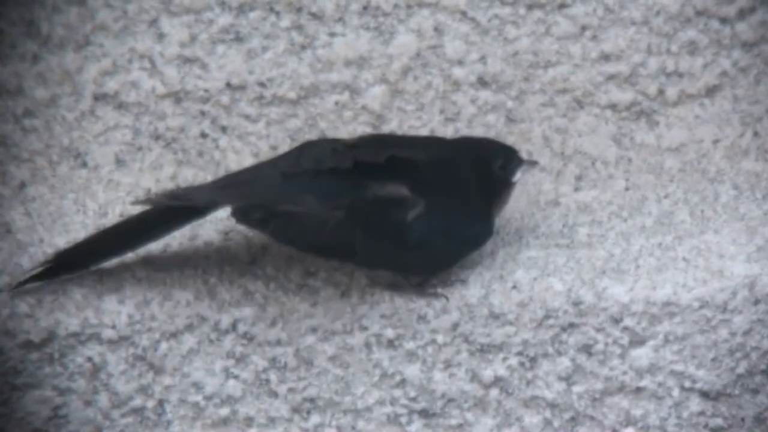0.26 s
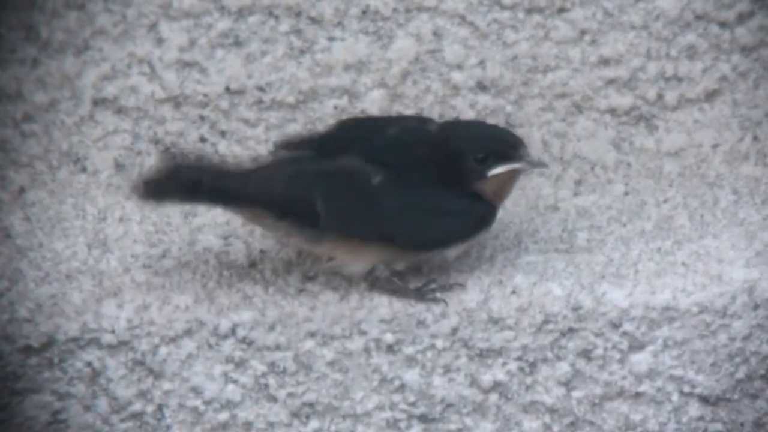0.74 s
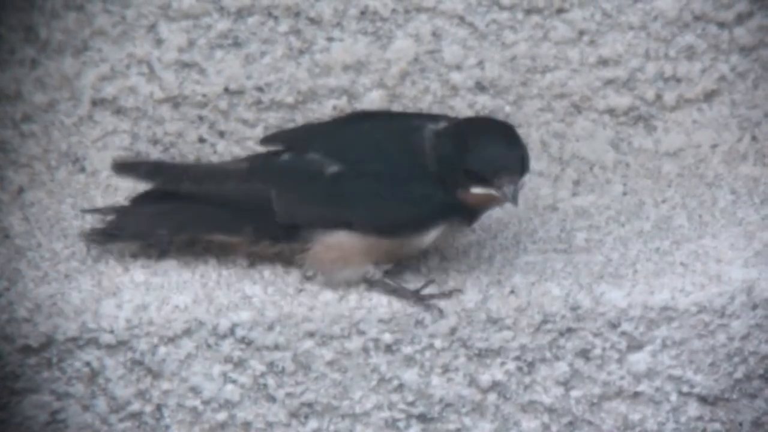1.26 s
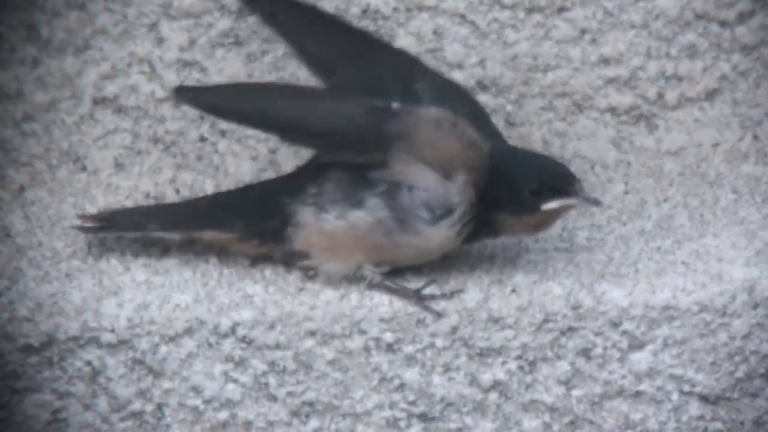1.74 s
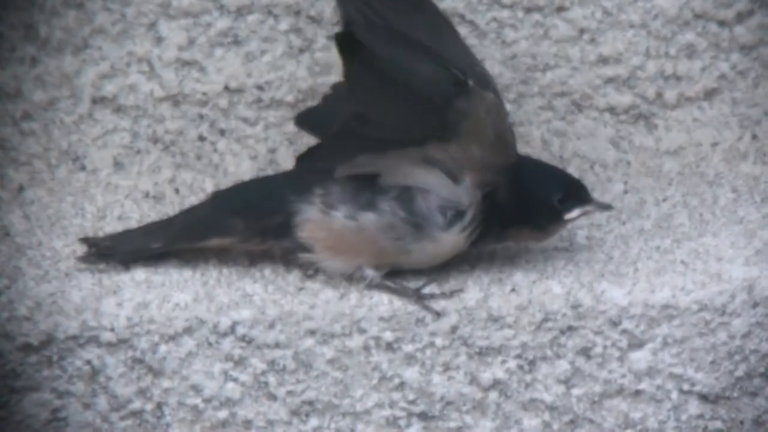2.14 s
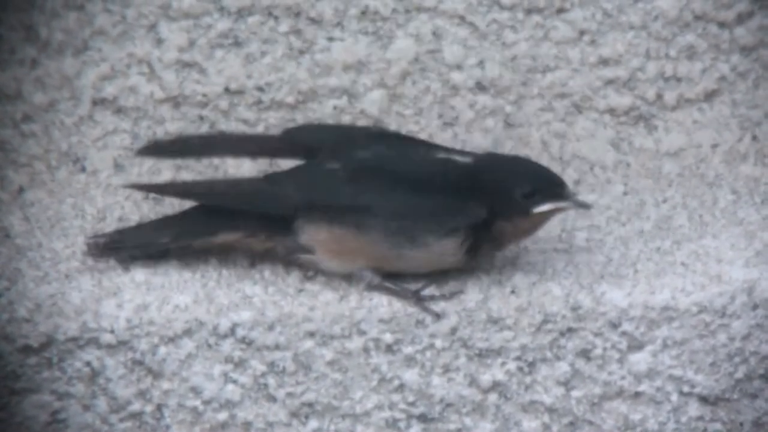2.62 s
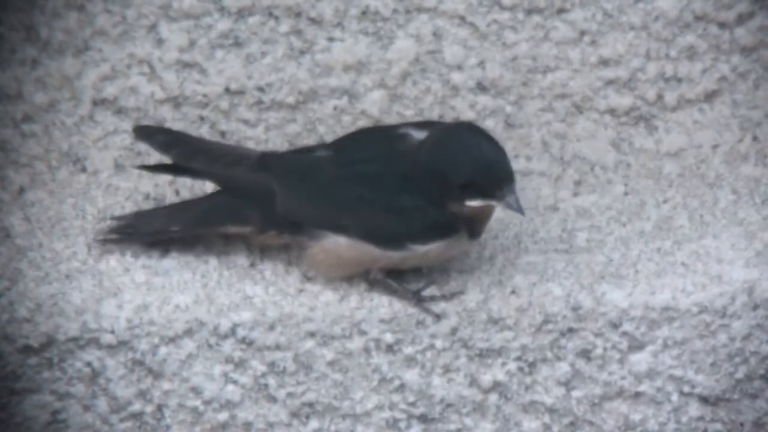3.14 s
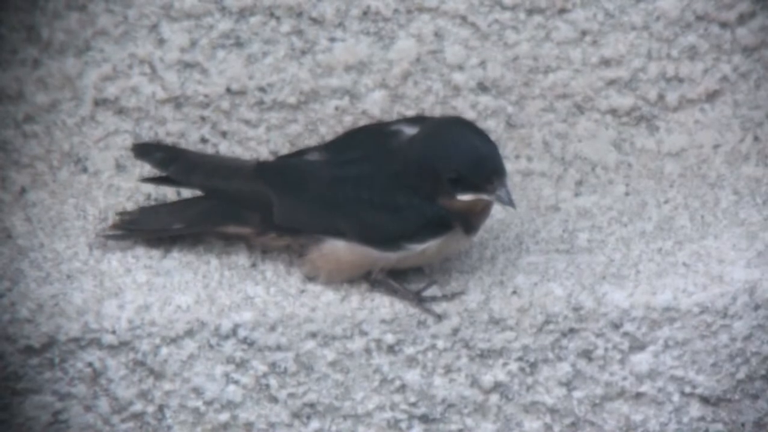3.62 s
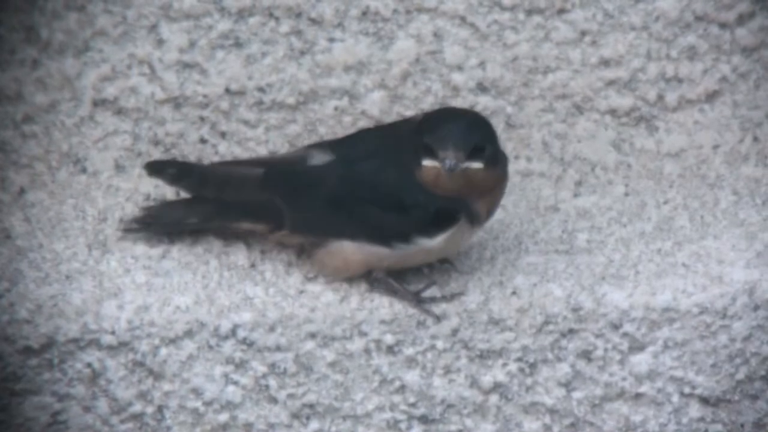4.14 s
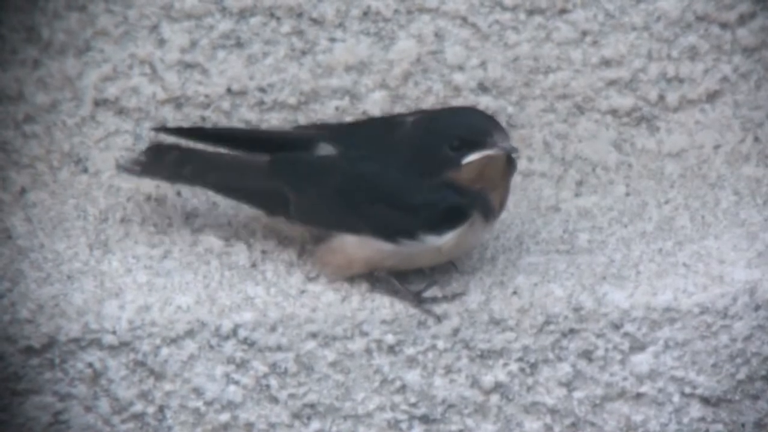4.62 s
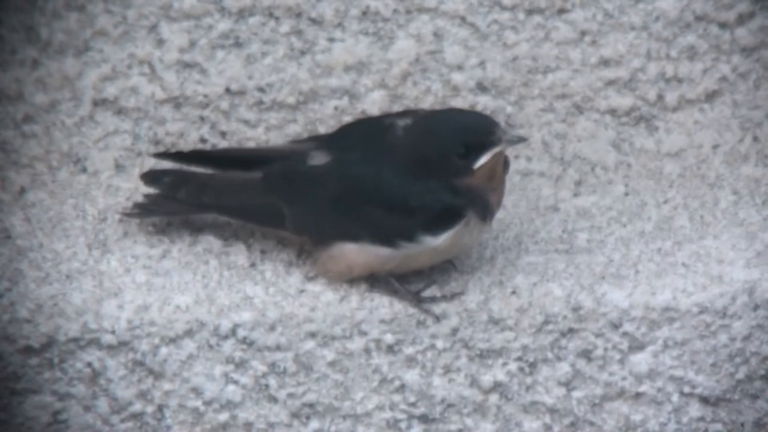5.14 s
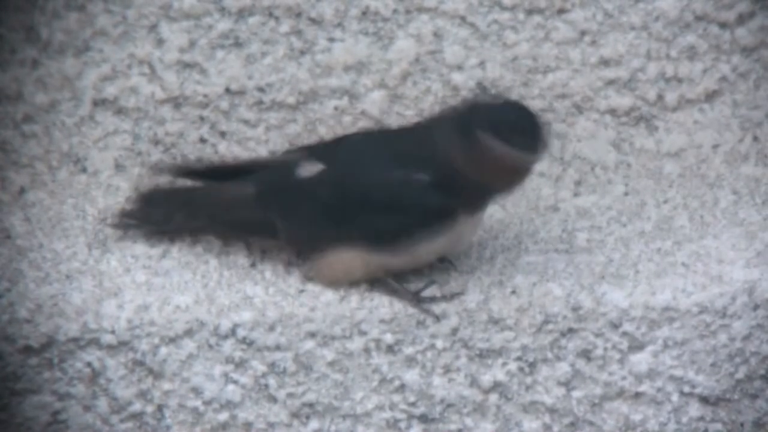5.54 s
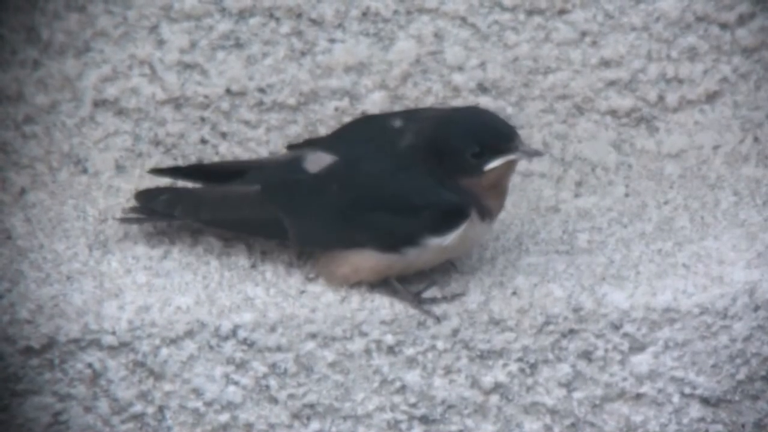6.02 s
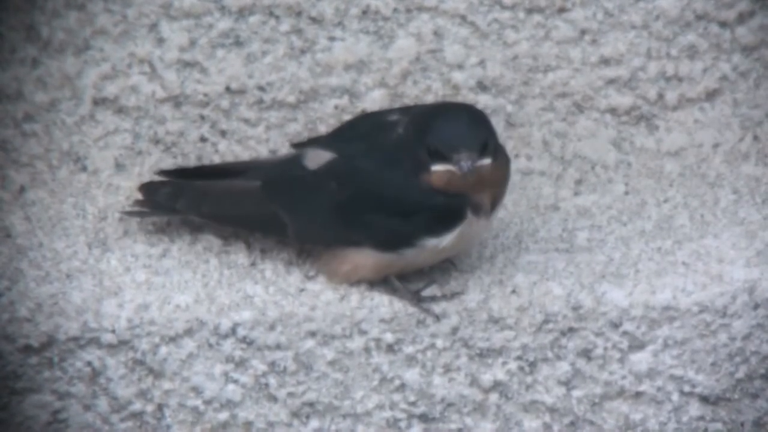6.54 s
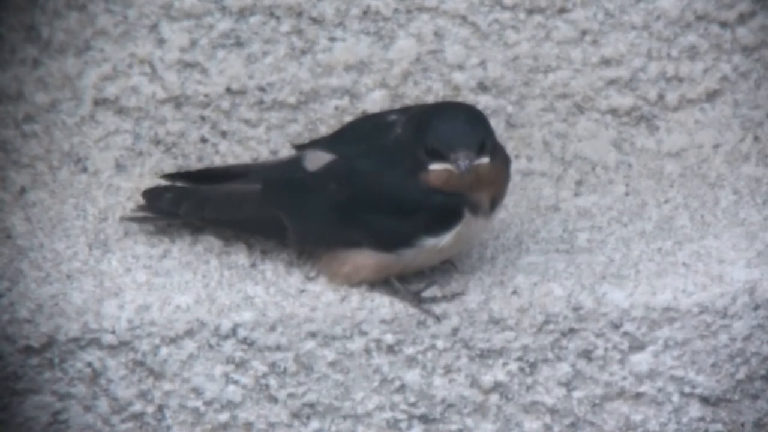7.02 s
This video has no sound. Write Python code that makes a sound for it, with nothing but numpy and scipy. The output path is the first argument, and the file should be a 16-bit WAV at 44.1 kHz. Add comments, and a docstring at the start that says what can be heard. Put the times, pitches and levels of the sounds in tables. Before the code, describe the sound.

Steady bright hiss, strongest in the upper mids, fills an outdoor spot beside stone walls. Over it a fledgling swallow repeats a hoarse, high chirp of three rapidly descending notes, six times with about a second between. Each chirp leaves a brief echoing tail. Other birds whistle softly far off, a few small dry clicks appear, and the hiss grows slightly towards the end. No wing flaps stand out.

```python
"""Young barn swallow on a stone ledge

A young barn swallow calls about once a second: three quick falling near-sine notes in raspy noise.
Nearby masonry smears each call with echoes and a noise tail; a wall further off throws it back.
Other birds, slurred sines, whistle faintly in the distance over a steady high hiss of shaped noise.
A faint hum of narrow noise bands, brief flurries of high noise, bill snaps and a few small ticks join in.
"""
import sys
import numpy as np
from scipy import signal
from scipy.fft import rfft, irfft
from scipy.io import wavfile

SR = 44100
rng = np.random.default_rng(int(sys.argv[2]) if len(sys.argv) > 2 else 0)


def store_pcm(level_fs):
    """Save levels as 16-bit WAV."""
    pcm = np.round(np.clip(level_fs, -1, 1) * 32767).astype(np.int16)
    wavfile.write(sys.argv[1], SR, np.atleast_2d(pcm).T)


N = 320607
TIME = np.arange(N) / SR
FREQS = np.arange(N // 2 + 1) * SR / N


def undb(db):
    """Decibels to gain."""
    return 10 ** (np.asarray(db) / 20)


def unit(x):
    """Scale to an rms of 1."""
    return x / np.sqrt(np.mean(x ** 2))


def add(track, s, sound):
    """Mix a sound into a track at a time in seconds."""
    i = max(int(s * SR), 0)
    track[i:i + len(sound)] += sound[:N - i]


def colour(points):
    """Gain at every frequency from (f/Hz, level/dB) points."""
    hz, db = np.transpose(points)
    return undb(np.interp(np.log(FREQS + 1), np.log(hz), db))


def bell(hz, width_hz):
    """Rounded hump over frequency, half as high half a width from its centre."""
    return .5 ** ((2 * (FREQS - hz) / width_hz) ** 2)


def noise(gain):
    """Noise of rms 1, its spectrum shaped by the given gain at every frequency."""
    return unit(irfft(rfft(rng.standard_normal(N)) * gain, N))


def gate(length_s, edge):
    """Flat envelope whose soft edges take the given share of it."""
    return signal.windows.tukey(int(length_s * SR), edge)


# spectrum of the hiss: f/Hz, relative level per Hz/dB
HISS_SPECTRUM = [(25, -58), (100, -47), (200, -40.5), (400, -30.5), (750, -21), (1400, -15), (2200, -9.5),
                 (3000, -4), (4300, -7), (6050, -15), (7500, -18), (9000, -19.5), (11000, -33),
                 (15500, -46)]
# resonances in the hiss: f/Hz, width/Hz, boost/dB
HISS_RESONANCES = [(2976, 560, 4), (6790, 430, 4.5), (8350, 690, 2.5)]
# stereo width of the hiss: f/Hz, side minus mid level/dB
HISS_WIDTH = [(30, -13), (60, -14), (125, -30), (500, -37), (700, -64), (1400, -52), (2400, -80),
              (4000, -48), (8000, -12), (12000, -4)]
HISS_DB = -30.5
SWELL_FROM_S, SWELL_DB_PER_S = 5.3, 0.97  # the hiss holds steady, then slowly grows


def outdoor_hiss(flicker_db=0.64, sizzle_db=0.35):
    """Smooth noise, strongest near 3 kHz and wide mostly in the treble; its level flickers and swells late."""
    resonance_db = sum(db * bell(hz, width) for hz, width, db in HISS_RESONANCES)
    gain = colour(HISS_SPECTRUM) * undb(resonance_db)
    treble = colour([(4000, -46), (7000, 0.5)])
    rest = np.sqrt(np.clip(1 - treble ** 2, 0, 1))

    def layer(share):
        """Noise holding its share of the whole spectrum's energy."""
        part = gain * share
        return noise(part) * np.linalg.norm(part) / np.linalg.norm(gain)

    low, high, side = layer(rest), layer(treble), layer(colour(HISS_WIDTH))
    mid = low + high * undb(sizzle_db * noise(bell(0, 60)))  # the treble flickers on its own
    swell_db = SWELL_DB_PER_S * np.maximum(TIME - SWELL_FROM_S, 0)
    level = undb(HISS_DB + swell_db + flicker_db * noise(bell(0, 30)))
    return level * (mid + np.array([side, -side]))


# noise bands of the faint hum: f/Hz, width/Hz, level/dB
HUM_BANDS = [(499.4, 9.3, -71), (653, 7.3, -73)]


def hum():
    """Noise bands so narrow that they sound almost like held tones."""
    return sum(undb(db) * noise(bell(hz, width)) for hz, width, db in HUM_BANDS)


# distant whistles: t/s, length/s, start f/Hz, end f/Hz, level/dB
DISTANT_WHISTLES = [(.313, 0.052, 2400, 2300, -36), (.368, 0.019, 4220, 4100, -32),
                    (.392, .028, 3530, 3970, -30), (1.43, .12, 4800, 4140, -37),
                    (1.689, 0.14, 3920, 3500, -33.5), (1.83, 0.064, 3950, 4820, -38),
                    (2.275, .16, 4260, 3860, -36.5), (3.23, .13, 4400, 5200, -41),
                    (4.089, .02, 3720, 3870, -28), (5.64, .027, 3590, 4010, -31),
                    (6.065, .044, 4440, 4400, -37), (6.185, .063, 3760, 3840, -34),
                    (6.69, .125, 3920, 4100, -32.5), (6.895, .13, 4190, 4070, -34.5),
                    (7.002, .059, 4050, 3420, -32)]
ARCH_HZ = 44  # every whistle bows upward in its middle


def far_birds(waver=0.0066, fade_db=2.0, wet_db=-9, t60_s=0.31):
    """Slurred sines that waver and fade on their long way, trailed by a noise reverb."""
    out, drift = np.zeros(N), noise(bell(0, 370))
    for s, length, start_hz, end_hz, db in DISTANT_WHISTLES:
        env = gate(length, edge=0.15)
        u = np.linspace(0, 1, len(env))
        hz = start_hz + (end_hz - start_hz) * u + ARCH_HZ * np.sin(np.pi * u)
        hz = hz * (1 + waver * drift[int(s * SR):][:len(env)])
        phase = 2 * np.pi * np.cumsum(hz) / SR
        add(out, s, undb(db) * env * np.sin(phase))
    out = out * undb(fade_db * noise(bell(0, 180)))
    tail = unit(rng.standard_normal(N) * undb(-60 * TIME / t60_s)) / np.sqrt(N)
    return out + undb(wet_db) * signal.fftconvolve(out, tail)[:N]


# swallow calls: t/s, length/s, top f/Hz, middle f/Hz, last f/Hz, level/dB,
# middle note accent/dB, last note accent/dB, far wall echo level/dB, bill snap level/dB
CALLS = [(0.58, 0.084, 5050, 4480, 3970, -21.5, -0.5, -1.5, -14.5, -70),
         (1.944, 0.075, 5070, 4370, 3950, -22.5, 4, .5, -14, -50),
         (2.956, .083, 5016, 4470, 3950, -26, 4.5, 2.5, -8.5, -70),
         (3.964, .089, 5020, 4450, 3940, -22.5, 2, -5, -9, -50),
         (5.162, .085, 4950, 4460, 3920, -24, 4.5, -1.5, -8.5, -35),
         (6.317, .080, 5030, 4490, 3930, -22.5, 3.5, -.5, -11, -53)]


def rasp(lead_s=0.017, trail_s=0.014, rasp_db=-30.5, squeak_db=-36, squeak_hz=5900, grain_db=2.5,
         break_share=0.58):
    """The young voice breaks up: grainy noise, with a higher squeak at the start and before the last note."""
    hoarse, squeak = np.zeros(N), np.zeros(N)
    for s, length, *_ in CALLS:
        add(hoarse, s - lead_s, gate(lead_s + length + trail_s, edge=0.51))
        add(squeak, s - lead_s, gate(0.022, edge=0.4))
        add(squeak, s + break_share * length, gate(0.018, edge=0.95))
    grain = undb(grain_db * noise(bell(0, 500)))
    body = noise(colour([(1500, -42.5), (2700, -10.5), (4300, -0.5), (6100, -9.5),
                         (7500, -20.0), (10000, -31), (15000, -48)]))
    hoarse = undb(rasp_db) * hoarse * body
    squeak = undb(squeak_db) * squeak * noise(bell(squeak_hz, 1300))
    return grain * (hoarse + squeak)


# three falling notes of a call: start t/share of call, length/share of call
CALL_RHYTHM = [(0, .32), (.335, .25), (.68, .32)]
# arched first, wavering second, scooped third note: t/share of note, f/ratio to note pitch, level/dB
NOTE_SHAPES = [
    [(0, .85, -7), (.14, .96, -3), (.28, 1, 0), (.68, .995, 0), (.85, .95, -3), (1, .84, -7)],
    [(0, .93, -7), (.18, 1.03, 1), (.45, .99, -1), (.75, .995, 0), (1, .98, -2)],
    [(0, .88, -10), (.3, .94, -6), (.52, 1.003, -1), (.82, 1, 1), (1, .985, -1)],
]


def notes():
    """The motif stretched to each call: (t/s, length/s, f/Hz, level/dB, shape) for every note."""
    out = []
    for s, length, *pitches, db, middle_db, last_db, _, _ in CALLS:
        stresses = (0, middle_db, last_db)
        for (start, share), hz, stress_db, shape in zip(CALL_RHYTHM, pitches, stresses, NOTE_SHAPES):
            out.append((s + start * length, share * length, hz, db + stress_db, shape))
    return out


def swallow(jitter=0.0093, tremble_hz=420, throb_hz=140, throb_db=2, octave_db=-26):
    """Each note is a near sine that throbs in level, trembles in pitch and carries a weak octave."""
    tone, octave = np.zeros(N), np.zeros(N)
    tremble = noise(bell(0, 2 * tremble_hz))
    for s, length, hz, db, shape in notes():
        env = gate(length, edge=0.23)
        u = np.linspace(0, 1, len(env))
        span = int(s * SR) + np.arange(len(env))
        share, ratio, shape_db = np.transpose(shape)
        pitch = hz * np.interp(u, share, ratio) * (1 + jitter * tremble[span])
        phase = 2 * np.pi * np.cumsum(pitch) / SR
        throb = -np.cos(2 * np.pi * throb_hz * length * u)
        level_db = db + np.interp(u, share, shape_db) + throb_db * throb
        env = np.sqrt(2) * env * undb(level_db)  # sqrt(2) makes the level an rms level
        add(tone, s, env * np.sin(phase))
        add(octave, s, env * np.sin(2 * phase))
    # only the octaves of the lower notes carry: the treble falls steeply above 9 kHz
    octave = irfft(rfft(octave) * colour([(9000, 1.5), (10000, -12)]), N)
    return tone + undb(octave_db) * octave


# echoes off nearby masonry: delay t/s, level/dB
MASONRY_ECHOES = [(.0071, -18), (.0163, -15), (.0245, -18), (.082, -21)]
FAR_WALL_S = .119  # delay of the far wall's echo


def walls(x, tail_db=-9.5, t60_s=1.2, far_db=-13, spread_s=0.08, ring_hz=5060, ring_db=2):
    """Single echoes off masonry, a diffuse tail, and a scattered return from further away."""
    out, t = np.zeros(N), TIME[:SR // 2]
    near = undb(tail_db) * unit(undb(-60 * t / t60_s))
    far = undb(far_db) * unit(np.exp(-np.abs(t - FAR_WALL_S) / spread_s))
    # the bird turns its head between calls, so each one is scattered in its own way
    cuts = [int((s - .3) * SR) for s, *_ in CALLS] + [N]
    for a, b, (*_, echo_db, _) in zip(cuts, cuts[1:], CALLS):
        response = np.hypot(near, far) * rng.standard_normal(len(t)) / np.sqrt(len(t))
        for s, db in MASONRY_ECHOES + [(FAR_WALL_S, echo_db)]:
            response[int(s * SR)] += undb(db)
        add(out, a / SR, signal.fftconvolve(x[a:b], response))
    # a boost around the top note's pitch
    return irfft(rfft(out) * undb(ring_db * bell(ring_hz, 250)), N)


SNAP_SHARE = .4  # the bill snaps this far into a call


def bill_snaps(snap_s=.003, snap_hz=13300):
    """A tiny burst of very high noise in each call, of widely varying strength."""
    snaps = np.zeros(N)
    for s, length, *_, snap_db in CALLS:
        add(snaps, s + SNAP_SHARE * length, undb(snap_db) * gate(snap_s, edge=1))
    return snaps * noise(bell(snap_hz, 3500))


# small dry ticks: t/s, f/Hz, peak level/dB
DRY_TICKS = [(0.698, 2990, -23), (1.031, 3040, -24.5), (5.605, 2850, -23.5), (6.711, 2870, -22),
             (6.917, 2510, -24)]


def ticks(ring_s=0.0087):
    """Short dry pips: a few milliseconds of sine with soft edges."""
    out, env = np.zeros(N), gate(ring_s, edge=0.36)
    for s, hz, db in DRY_TICKS:
        add(out, s, undb(db) * env * np.sin(2 * np.pi * hz * TIME[:len(env)]))
    return out


# brief flurries of high hiss: t/s, length/s, level/dB
HISS_FLURRIES = [(0.922, .04, -39), (6.647, 0.13, -41.5), (6.92, .11, -39.5)]


def flurries(flurry_hz=6500):
    """Brief soft-edged puffs of high noise."""
    out = np.zeros(N)
    for s, length, db in HISS_FLURRIES:
        add(out, s, undb(db) * gate(length, edge=0.5))
    return out * noise(bell(flurry_hz, 4300))


def scene():
    """The birds sit in the middle of the stereo hiss."""
    outdoors = outdoor_hiss() + hum() + flurries()
    call = rasp() + swallow()
    return outdoors + far_birds() + call + walls(call) + bill_snaps() + ticks()


TOP_HZ = 15500


def record(dry):
    """The recorder cuts the top with a steep low-pass."""
    return signal.sosfilt(signal.ellip(10, .1, 80, TOP_HZ, fs=SR, output="sos"), dry)


dry = scene()
out = record(dry)
store_pcm(out)
```